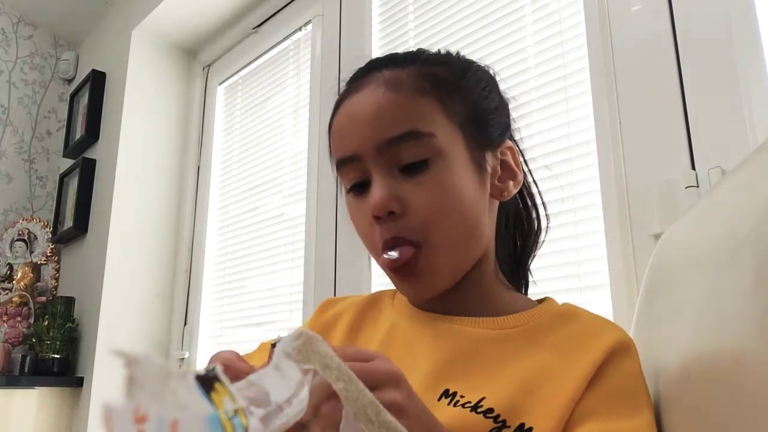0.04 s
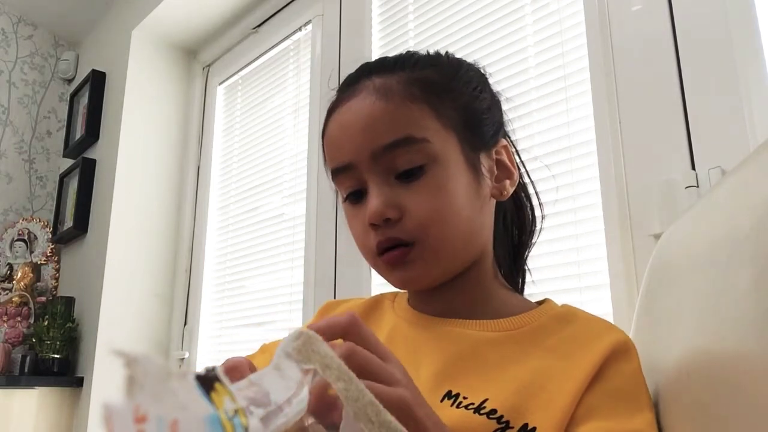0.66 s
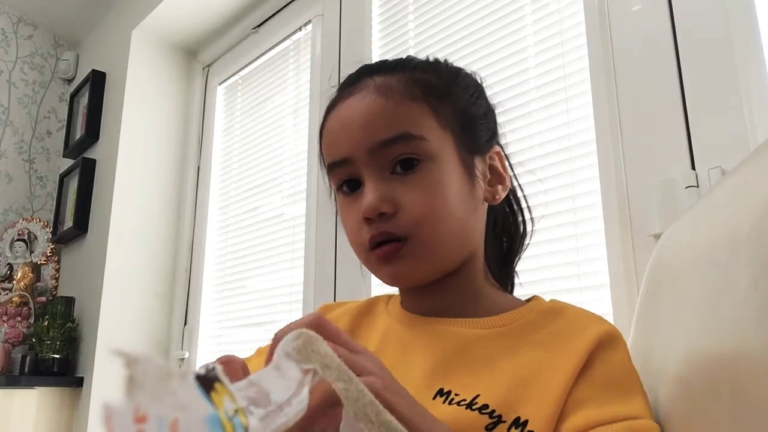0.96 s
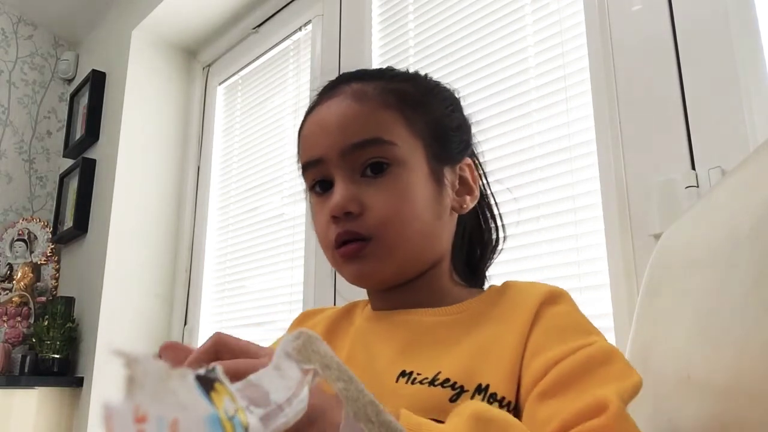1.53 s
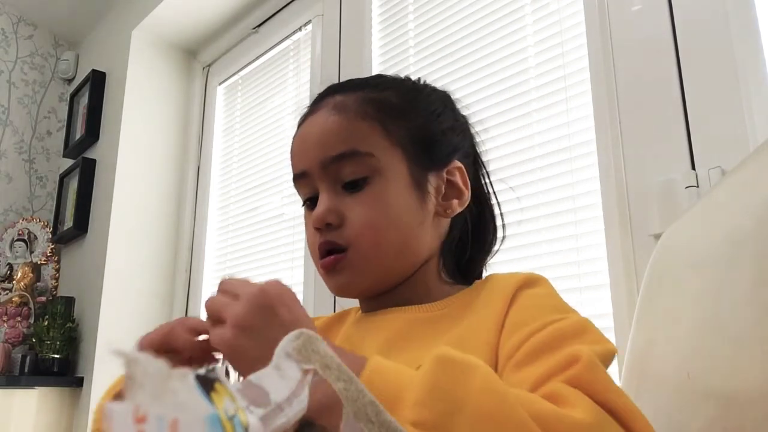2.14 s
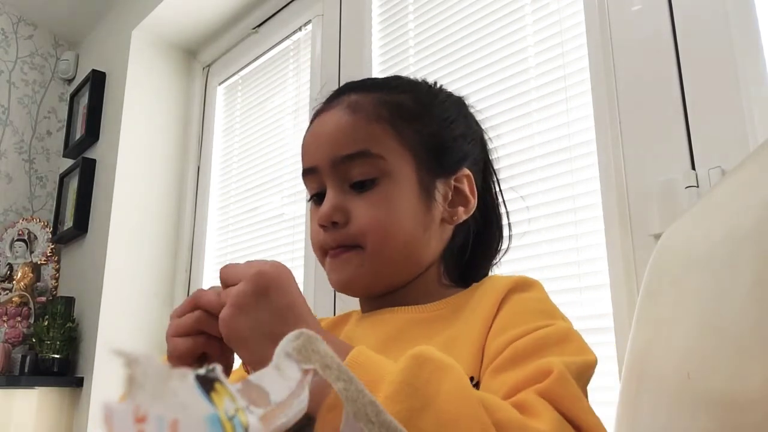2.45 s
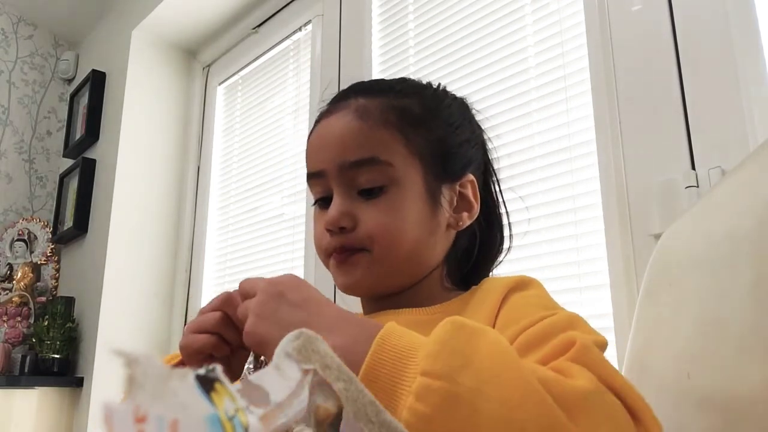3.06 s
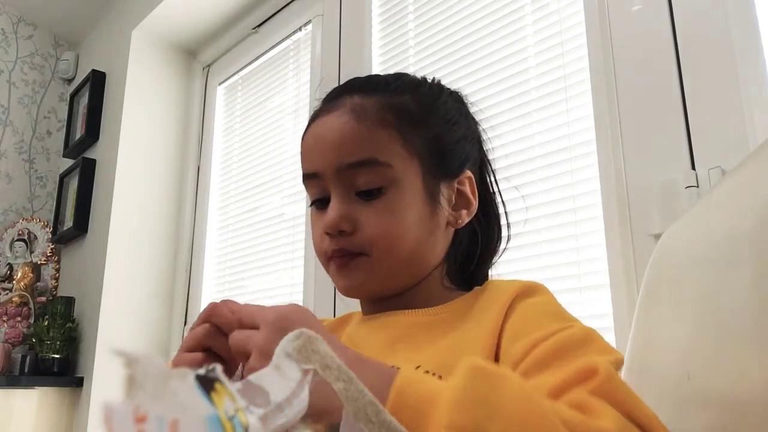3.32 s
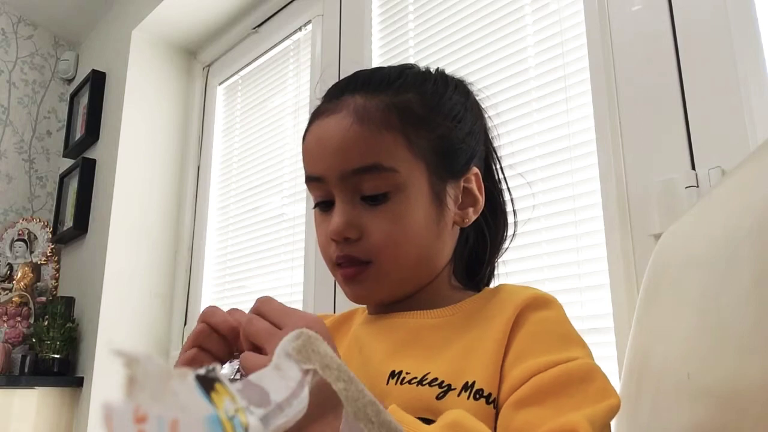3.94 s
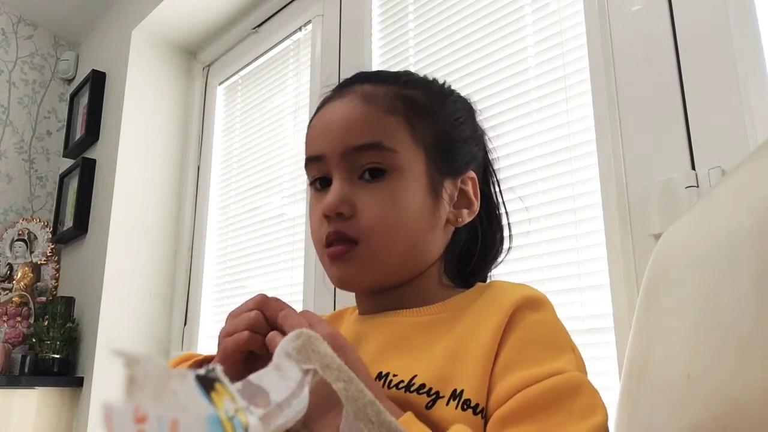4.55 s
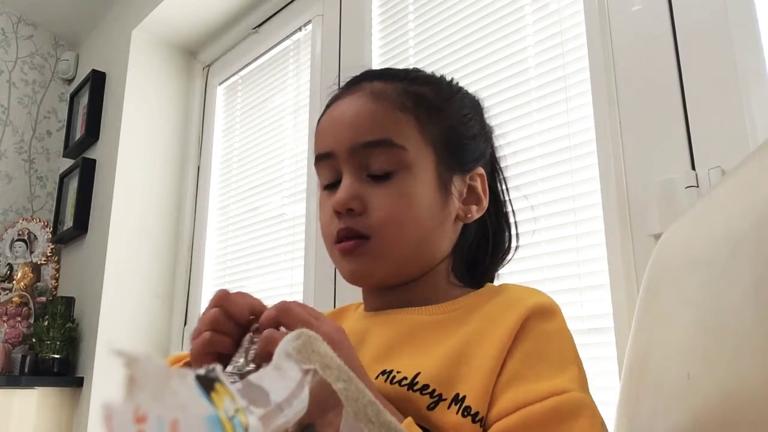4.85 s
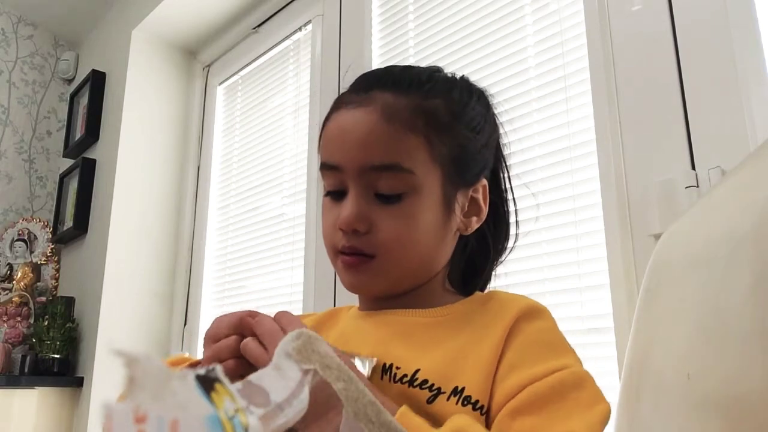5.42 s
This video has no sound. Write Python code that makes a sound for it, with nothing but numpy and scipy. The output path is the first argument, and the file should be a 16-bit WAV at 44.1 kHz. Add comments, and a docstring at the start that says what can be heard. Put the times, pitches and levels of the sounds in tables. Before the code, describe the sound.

A small plastic packet is handled close by in a quiet living room for about five and a half seconds. Its fine crackle follows the fingers in uneven spurts, dotted with short bright snaps. Dull thumps on the furniture land right at the start, at 0.4 seconds and at 0.8 seconds; the third is the strongest, with a low boom and brief rattle. The crinkling is busy and crisp from about 0.9 to 2.1 seconds, then lighter, with thin sizzles of plastic dragged between fingertips. Sharp snaps stand out at 3.3 seconds and around 4.1 seconds, followed by a brief lull. From about 4.8 to 5.2 seconds, several softer bumps sound under renewed crackling, and a few more snaps follow until the end. Each sound has a short room tail, over a faint steady hiss and soft hum.

```python
"""Crinkling a plastic packet

Hands pick and pull at a small packet at a table in a quiet living room. The film buckles in short
bright snaps over a fine crackle that follows the fingers; at times stick-slip friction adds a sizzle.
Early on, dull thumps excite the modes of the furniture, which boom and rattle; softer bumps come later.
Reflections from the room give the film and the thumps a short tail."""
import sys
import numpy as np
from scipy import signal
from scipy.fft import rfft, irfft
from scipy.io import wavfile

SR = 44100
rng = np.random.default_rng(int(sys.argv[2]) if len(sys.argv) > 2 else 0)


def generate_wav(signal):
    """Clip the signal to [-1, 1] and save it as 16-bit WAV at the path in sys.argv[1]."""
    frames = np.transpose(np.atleast_2d(signal))
    scaled = np.clip(frames, -1, 1) * 32767
    pcm = np.round(scaled).astype(np.int16)
    wavfile.write(sys.argv[1], SR, pcm)


N = 246517

# Spectrum of the still room: f/Hz, level/dB
AIR_SPECTRUM = [(25, -2), (60, -0.5), (120, -3), (200, -3.5), (330, -4), (420, -4), (560, -16), (800, -15),
                (1500, -18.5), (4000, -20), (9000, -31.5), (16000, -51)]
# Squeezes and pulls of the fingers: t/s, duration/s, crackle level/dB, brightness/dB
FINGER_SQUEEZES = [(.005, 0.03, -56.5, -11), (0.167, 0.051, -61, -12), (0.191, 0.13, -50, -2),
                   (0.388, 0.034, -44.5, -6), (0.48, .13, -51.5, 0.5), (0.627, 0.08, -60.5, 3),
                   (.9, 0.12, -62, 6), (1.054, 0.015, -43, 1), (1.103, 0.26, -58.5, 1.5),
                   (1.313, 0.068, -44.5, 12.5), (1.425, 0.14, -51, 6), (1.586, 0.15, -54.5, 4.5),
                   (1.77, 0.19, -64, -3), (1.93, 0.19, -53.5, 6), (2.0, 0.061, -51, -7.5),
                   (2.26, 0.045, -59, 5.5), (2.364, 0.16, -57, 5.5), (2.585, 0.033, -51, 5),
                   (2.703, 0.11, -55.5, 4.5), (2.85, 0.17, -62.5, -2.5), (3.035, 0.08, -55.5, -9.5),
                   (3.191, 0.086, -53, 5), (3.292, 0.024, -53.5, -10.5), (3.588, 0.11, -59, 4),
                   (3.704, .05, -55.5, 0), (3.788, 0.028, -52, 6.5), (3.932, .05, -59, -1),
                   (3.973, 0.069, -52.5, 1), (4.078, .1, -52, 1), (4.27, 0.14, -68, 10),
                   (4.56, 0.19, -61.5, 2.5), (4.773, 0.17, -58.5, 3), (4.925, 0.17, -54.5, -1),
                   (5.03, 0.24, -56, -3.5), (5.308, 0.061, -52.5, 6), (5.454, 0.18, -55.5, -6)]
# Spectrum radiated by the film: f/Hz, level/dB
FILM_SPECTRUM = [(150, -5), (700, -43), (1050, -2), (1550, -2.5), (2400, -4), (3400, 2), (4400, -0.5),
                 (5400, 0), (7200, -1), (8500, 4.5), (9600, -0.5), (11000, -7), (13000, -10.5),
                 (16000, -20)]
# Loud buckles, dull if broad and bright if small: t/s, level/dB, brightness/dB, panel f/Hz
BUCKLES = [(.0075,-50,5,4850), (0.2177,-53.5,-3.5,2640), (0.266,-49.5,0,3270), (.3,-49.5,9.5,4380),
           (0.355,-45.5,5.5,2900), (0.4001,-45,-8,1190), (0.5068,-45.5,6.5,1260), (.8981,-41,2,2820),
           (.905,-41,4,1950), (1.062,-43.5,8.5,3550), (1.0766,-45,-3.5,1250), (1.114,-41,0.5,3700),
           (1.1535,-44,4.5,1545), (1.3112,-49.5,5,3660), (1.347,-44,6,3860), (1.3657,-43,3,3860),
           (1.3732,-48,-0.5,1660), (1.4225,-53.5,13,2930), (1.48,-43,-0.5,3700), (1.487,-41.5,4,4170),
           (1.4939,-51,10,3570), (1.522,-52,2.5,3700), (1.5503,-56,11.5,3860), (1.688,-52,-2,2680),
           (1.815,-58,1,3520), (1.842,-57,0,2170), (1.9224,-49.5,4,4240), (1.9835,-48.5,-6,1630),
           (2.0194,-43.5,-3,3200), (2.0399,-49,-5,3000), (2.0534,-46.5,-8.5,1740), (2.261,-59.5,3,1580),
           (2.314,-67.5,-17.5,1740), (2.3813,-47,3,3100), (2.407,-54.5,-10,1740), (2.4857,-59,-4,1730),
           (2.596,-49.5,7.5,3100), (2.8,-58,7,3500), (2.947,-55.5,-1.5,1610), (2.9693,-57.5,10.5,3910),
           (3.056,-59,9,3100), (3.0856,-51,14,3920), (3.234,-49,-2,1800), (3.2567,-50,-1,1240),
           (3.3022,-39,5.5,3200), (3.3248,-46.5,9.5,3940), (3.5478,-57.5,-2,1740), (3.578,-58.5,-8,1650),
           (3.6034,-55.5,12,1530), (3.634,-58.5,-2,2800), (3.7126,-54,1,1560), (3.774,-49.5,-0.5,4040),
           (3.7872,-46.5,1.5,3730), (3.928,-55,-3.5,3940), (3.9655,-55,-6,1740), (3.9975,-44.5,1,3940),
           (4.0107,-45.5,-2,1750), (4.025,-51,0,1490), (4.082,-38.5,2.5,3300), (4.044,-59,-7,1560),
           (4.1289,-44,-2.5,1620), (4.1627,-39.5,-.5,1770), (4.2458,-57,0.5,1600), (4.3443,-59.5,9.5,3050),
           (4.431,-65,14.5,4310), (4.4652,-67.5,-12.5,1590), (4.535,-66,18.5,1590), (4.569,-48,-2.5,2060),
           (4.679,-52,-4.5,1220), (4.7189,-60.5,-3,1400), (4.8411,-62,18,2400), (4.868,-56.5,-2,1630),
           (4.9345,-52.5,-0.5,3400), (5.0093,-49,1,1630), (5.025,-50.5,9,3470), (5.1492,-51,7,3430),
           (5.332,-48,-5,3000), (5.3458,-41.5,0.5,1650), (5.437,-52,2.5,1700), (5.451,-47.5,-4,1600),
           (5.543,-48.5,2,2410)]
# Low, middle and high band in which a buckle rings: lower f/Hz, upper f/Hz
BUCKLE_BANDS = [(1300, 2500), (2500, 7000), (7000, 16000)]
# Low modes excited by the thumps: t/s, f/Hz, level/dB, swell time/s, T60/s
LOW_MODES = [(0.011, 190.6, -15, 0.014, 0.22), (0.013, 58.5, -38.5, 0.02, 1), (0.02, 388, -32, 0.023, 0.11),
             (0.815, 572, -26.5, 0.0059, 0.25), (0.403, 144.7, -24, 0.018, 0.155),
             (0.404, 341.6, -29, 0.005, 0.18), (0.405, 63.4, -33, 0.01, 0.46),
             (0.491, 62.4, -29, 0.0059, 0.36), (0.679, 67.5, -36, 0.03, 1),
             (0.816, 64.6, -15.5, 0.0124, 0.27), (0.82, 305, -32, 0.018, 0.46),
             (0.82, 98.8, -16, 0.018, 0.42), (5.126, 187.4, -41.5, 0.024, 0.51),
             (5.126, 630, -35.5, 0.005, 0.24), (5.21, 205, -41.5, 0.022, 0.42)]
# Contacts with the furniture: t/s, duration/s, body level/dB, bass re body/dB, rattle level/dB
CONTACTS = [(0.022, 0.031, -29, -0.5, -51), (0.105, 0.063, -43, 3, -61),
            (0.401, 0.026, -28.5, -11.5, -46.5), (0.495, 0.072, -58, 15.5, -60.5),
            (0.69, 0.22, -52.5, 3, -64), (0.811, 0.057, -26.5, -6, -33), (1.086, 0.064, -48, -13, -69),
            (1.322, 0.069, -52, 6.5, -73), (1.912, 0.009, -41.5, -20, -70), (3.049, 0.02, -57.5, -5, -78),
            (3.208, 0.013, -42, -31.5, -59), (3.257, 0.0043, -58, -22, -55.5),
            (4.127, 0.0051, -50, -23, -64), (4.757, 0.022, -47, -11.5, -67),
            (4.805, 0.061, -53.5, -10, -67), (5.009, 0.031, -46.5, -19, -65),
            (5.071, 0.059, -46, -10, -59.5), (5.122, 0.065, -37, -6, -54), (5.189, 0.061, -43.5, -2.5, -59)]
# Spectra of the struck furniture and of its loose parts: f/Hz, level/dB
BODY_SPECTRUM = [(35, -15.5), (70, 0), (120, 1), (165, 5), (235, 1.5), (270, 1), (400, -1.5), (490, -4.5),
                 (585, -6), (680, -9), (880, -17), (1400, -19.5), (4000, -106)]
RATTLE_SPECTRUM = [(300, -25), (930, -7), (1010, -3), (1140, -0.5), (1345, 2), (1750, -2.5), (2300, -3),
                   (3400, -11), (5000, -22), (7500, -28), (12000, -39), (16000, -74)]
# Tight drags of the film between the fingertips: t/s, duration/s, f/Hz, level/dB
DRAGS = [(1.174, 0.075, 11300, -55), (2.396, 0.096, 11000, -59), (2.622, 0.25, 11100, -61),
         (3.311, 0.051, 5700, -45), (3.559, 0.087, 10400, -60), (4.08, 0.042, 5300, -45.5),
         (4.846, 0.043, 10500, -53)]


def undb(db):
    """Amplitude ratio for a level in decibels."""
    return 10 ** (np.asarray(db) / 20)


def unit(x):
    """Normalisation to an rms of one."""
    return x / np.sqrt(np.mean(x ** 2))


def add(out, at_s, x):
    """Superposition of x on out from a given time."""
    i = max(int(at_s * SR), 0)
    out[i:i + len(x)] += x[:max(len(out) - i, 0)]


def fade(t, t60):
    """Exponential decay from t = 0, by 60 dB in t60 seconds; unity before."""
    return np.exp(-np.log(1000) * np.maximum(t, 0) / t60)


def band(x, lo_hz, hi_hz, order=3):
    """Causal band-pass filtering."""
    edges_hz = [lo_hz, min(hi_hz, .48 * SR)]
    return signal.sosfilt(signal.butter(order, edges_hz, "band", fs=SR, output="sos"), x)


def minimum_phase(x, log_gain):
    """Minimum-phase filtering, from a log gain on an even frequency grid."""
    cepstrum = irfft(log_gain)
    half = len(cepstrum) // 2
    cepstrum[1:half] *= 2
    cepstrum[half + 1:] = 0
    return signal.fftconvolve(x, irfft(np.exp(rfft(cepstrum))))[:len(x)]


def colour(x, points, size=4096):
    """Spectral shaping along (f/Hz, level/dB) points."""
    hz, db = np.transpose(points)
    grid_hz = np.maximum(np.arange(size // 2 + 1) * SR / size, 1)
    return minimum_phase(x, np.log(undb(np.interp(np.log(grid_hz), np.log(hz), db))))


def room_tone(air_db=-64, hum_db=-69):
    """Stationary noise: broadband for the air of the house, narrowband for a soft hum."""
    air, hum = rng.standard_normal((2, N))
    air = unit(colour(air, AIR_SPECTRUM))
    hum = unit(band(hum, 439.0, 460.4, order=1))
    return air * undb(air_db) + hum * undb(hum_db)


def crease(t, panel_hz, panel_db=-11, jump_s=0.0017, uneven_db=4.5):
    """Elastic buckling: a crease yields with a tick, runs briefly and flexes the panel beside it."""
    run_s = jump_s * rng.uniform(0.21, 0.77)
    burst = rng.standard_normal(len(t)) * (fade(t - run_s, t60=0.018) + 0.81 * fade(t, t60=0.015))
    # Heavy damping leaves no narrow peaks, only a broad colour that differs with every fold.
    spectrum = np.abs(rfft(burst))
    peaks = np.maximum(spectrum / np.median(spectrum), 1)
    knots = np.linspace(0, len(spectrum), 22)
    fold = undb(uneven_db * np.interp(np.arange(len(spectrum)), knots, rng.standard_normal(len(knots))))
    burst = minimum_phase(burst, np.log(fold / peaks))
    panel = np.sin(2 * np.pi * panel_hz * t) * (1 - np.exp(-t / 0.00058)) * fade(t, t60=.010)
    return unit(unit(burst) + undb(panel_db) * unit(panel))


def strain(hold_db=-71, grip_s=0.011, relax_t60=0.31):
    """Dull and bright crackle envelopes: squeezes tighten, hold and relax, adding in power."""
    t = np.arange(SR) / SR
    dull, bright = np.full((2, N), undb(hold_db) ** 2)
    for at, length, db, bright_db in FINGER_SQUEEZES:
        squeeze = np.minimum(t / grip_s, 1) * fade(t - length, relax_t60)
        add(dull, at, (squeeze * undb(db - bright_db / 2)) ** 2)
        add(bright, at, (squeeze * undb(db + bright_db / 2)) ** 2)
    return np.sqrt(dull), np.sqrt(bright)


def crackle(tiny_per_s=430, large_per_s=45, scatter_db=3.4, large_db=13, rub_db=-10, split_hz=6800):
    """Shot noise of many creases yielding at random, with friction of film on film and on skin."""
    t = np.arange(256) / SR
    panels_hz = 1520 * 2 ** (1.153 * rng.random(size=200) ** 2)
    shapes = [crease(t, hz, jump_s=0.00033, uneven_db=4) for hz in panels_hz]
    rub, skin = rng.standard_normal((2, N))
    grains = np.zeros(N)
    for when, weakness, which in rng.random((int(tiny_per_s * N / SR), 3)):
        grain_db = -scatter_db * np.log(weakness + 0.07)
        add(grains, when * N / SR, shapes[int(which * len(shapes))] * undb(grain_db))
    for when, which in rng.random((int(large_per_s * N / SR), 2)):
        add(grains, when * N / SR, shapes[int(which * len(shapes))] * undb(large_db))
    film = unit(colour(unit(grains) + undb(rub_db) * rub, FILM_SPECTRUM))
    dull = signal.sosfiltfilt(signal.butter(2, split_hz, fs=SR, output="sos"), film)
    scuff = unit(band(skin, 530, 845, order=2)) * undb(-12)
    dull_gain, bright_gain = strain()
    return ((dull + scuff) * dull_gain + (film - dull) * bright_gain) * undb(-1)


def snaps(presence_db=3, lag_s=.0003, size=1024, attack_samples=176):
    """Snap-through of single large buckles; brightness tilts each from its low band to its high."""
    t = np.arange(size) / SR
    # The broader and duller the crease, the more its panel pops.
    creases = [crease(t, hz, panel_db=-10.5 - .5 * bright_db) for _, _, bright_db, hz in BUCKLES]
    creases = colour(np.concatenate(creases), FILM_SPECTRUM)
    out = np.zeros(N)
    for tilt, (lo, hi) in zip((-1, 0, 1), BUCKLE_BANDS):
        rings = band(creases, lo, hi).reshape(-1, size)
        for (at, db, bright_db, _), ring in zip(BUCKLES, rings):
            ring_db = db + (tilt * bright_db if tilt else presence_db)
            attack_rms = np.sqrt(np.mean(ring[:attack_samples] ** 2))
            add(out, at + lag_s, ring * undb(ring_db) / attack_rms)
    return out


def booms(waver=0.055, gain_db=-1):
    """Resonance: the lowest modes swell under a push, then decay freely, slightly unsteady in pitch."""
    t = np.arange(SR) / SR
    knots = np.linspace(0, 1, 80)
    out = np.zeros(N)
    for at, hz, db, swell, t60 in LOW_MODES:
        pitch_hz = hz * (1 + waver * np.interp(t, knots, rng.standard_normal(len(knots))))
        mode = np.sin(2 * np.pi * np.cumsum(pitch_hz) / SR)
        push = np.sin(np.pi / 2 * np.minimum(t / swell, 1)) ** 2
        add(out, at, mode * push * fade(t - swell, t60) * undb(db + gain_db))
    return out


def thumps(rise_s=.005, body_t60=0.25, rattle_t60=0.26, bass_hz=200, db_per_octave=22, chatter_db=1.5):
    """Modal overlap: soft impacts shake the furniture's crowded modes as noise; loose parts chatter."""
    t = np.arange(SR // 2) / SR
    knots = np.linspace(0, t[-1], 120)
    out = np.zeros(N)
    for at, contact_s, body_db, bass_db, rattle_db in CONTACTS:
        chatter = rng.standard_normal(len(knots))
        chatter[:2] = 1  # the first touch is always firm
        push = np.minimum(t / rise_s, 1) * undb(chatter_db * np.interp(t, knots, chatter))
        # Light touches hardly move the whole piece: they lack bass, the lightest also the low middle.
        corner_hz = bass_hz * 2 ** (-min(bass_db, 0) / db_per_octave)
        low_pass = signal.butter(2, corner_hz, fs=SR, output="sos")
        parts = (BODY_SPECTRUM, body_db, body_t60), (RATTLE_SPECTRUM, rattle_db - 1, rattle_t60)
        for spectrum, db, t60 in parts:
            shake = colour(rng.standard_normal(len(t)) * push * fade(t - contact_s, t60), spectrum)
            shake *= undb(db) / np.sqrt(np.mean(shake[t < contact_s + .01] ** 2))
            bass = signal.sosfiltfilt(low_pass, shake, padtype=None)
            add(out, at, shake + (undb(bass_db) - 1) * bass)
    return out


def sizzle(upper_db=-5, upper_ratio=1.29, half_width=0.09):
    """Stick-slip friction: very fine slips excite two resonances of the stretched film."""
    out = np.zeros(N)
    for at, length, hz, db in DRAGS:
        slips = rng.standard_normal(SR // 2)[:int(length * SR)]
        lower, upper = (band(slips, f * (1 - half_width), f * (1 + half_width), order=2)
                        for f in (hz, hz * upper_ratio))
        envelope = np.sqrt(np.hanning(len(slips)))
        add(out, at, unit(lower + undb(upper_db) * upper) * envelope * undb(db))
    return out


def room(x, wet_db, near_db=-14, near_s=0.0058, t60_mid=0.2, t60_high=0.36):
    """Reverberation: early scattering from the table and nearby things, then the tail of the walls."""
    t = np.arange(SR // 2) / SR
    mid, high, near = rng.standard_normal((3, len(t)))
    tail = band(mid, 110, 5700) * fade(t, t60_mid) + band(high, 3560, SR / 2) * fade(t, t60_high)
    tail *= np.clip(t / near_s - 1, 0, 1)
    near = near * (t > near_s) * fade(t - near_s, t60=0.019)
    response = undb(wet_db) * tail / np.linalg.norm(tail) + undb(near_db) * near / np.linalg.norm(near)
    return x + signal.fftconvolve(x, response)[:N]


def scene():
    """Superposition of packet, furniture and room tone in one channel."""
    packet = room(snaps() + crackle() + sizzle(), wet_db=-8.5)
    furniture = room(thumps(), wet_db=-16, t60_mid=1.0) + booms()
    return (packet + furniture + room_tone())[None]


def record(dry, bottom_hz=46, top_hz=16200):
    """Band limiting: steep filters remove the deepest bass and the highest treble."""
    dry = signal.sosfilt(signal.butter(7, bottom_hz, "high", fs=SR, output="sos"), dry)
    return signal.sosfilt(signal.ellip(8, .2, 70, top_hz, fs=SR, output="sos"), dry)


dry = scene()
out = record(dry)
generate_wav(out)
```